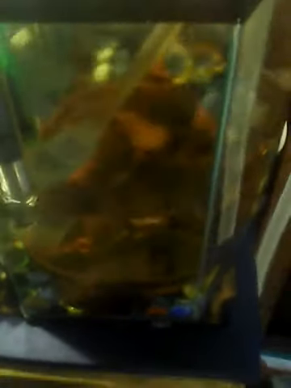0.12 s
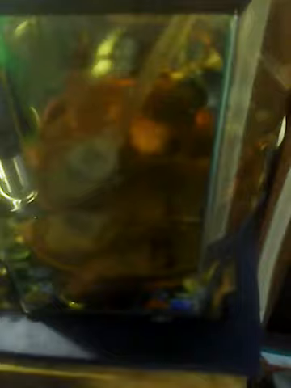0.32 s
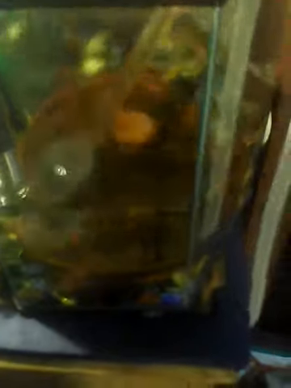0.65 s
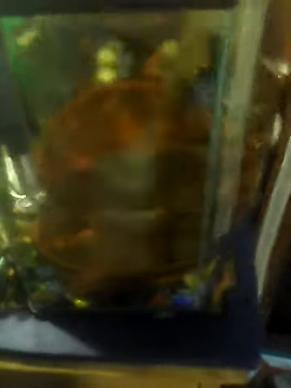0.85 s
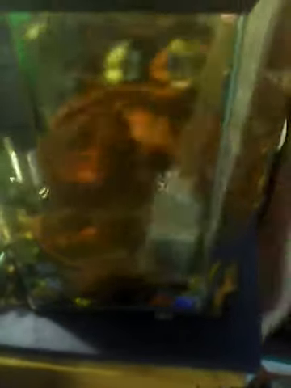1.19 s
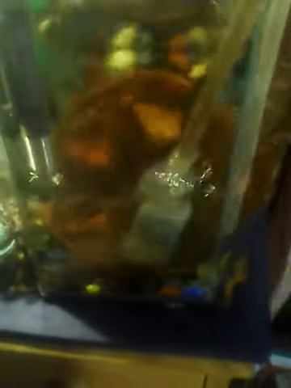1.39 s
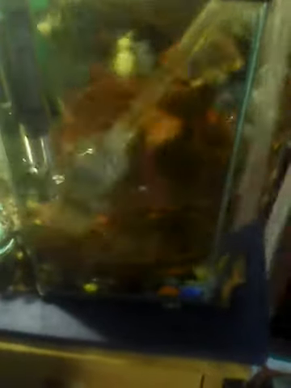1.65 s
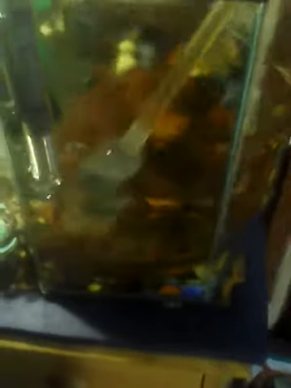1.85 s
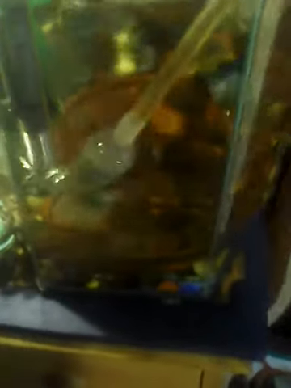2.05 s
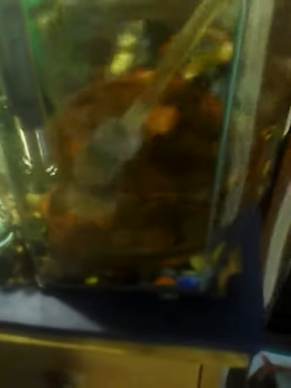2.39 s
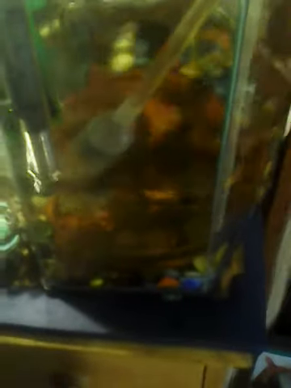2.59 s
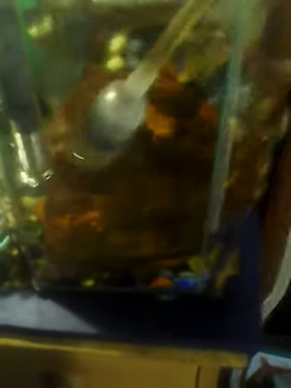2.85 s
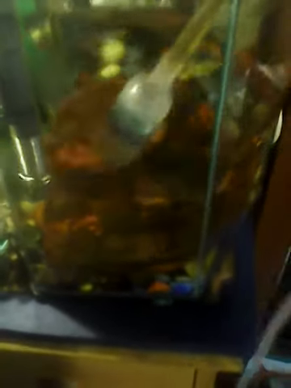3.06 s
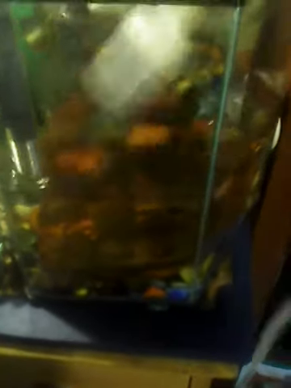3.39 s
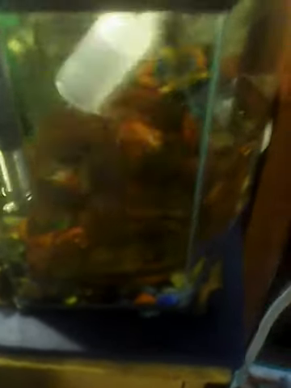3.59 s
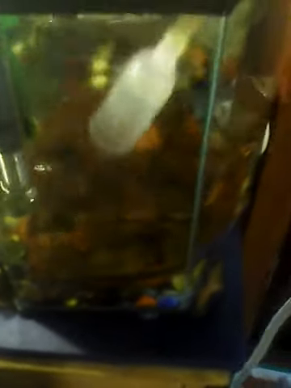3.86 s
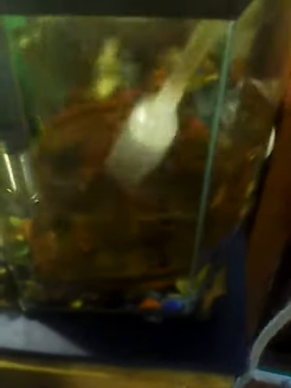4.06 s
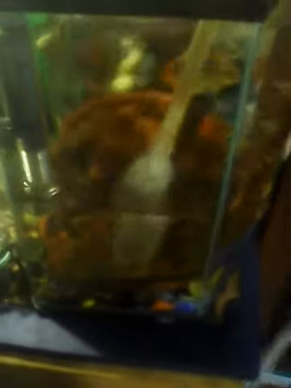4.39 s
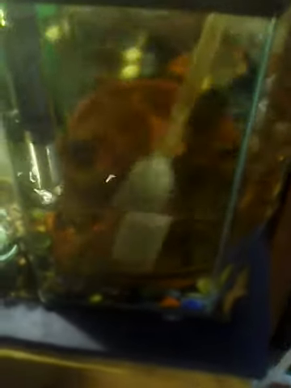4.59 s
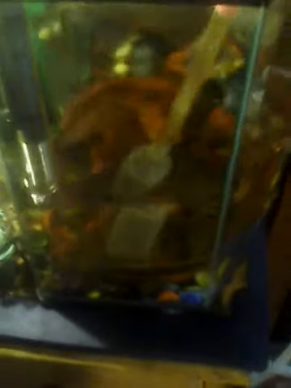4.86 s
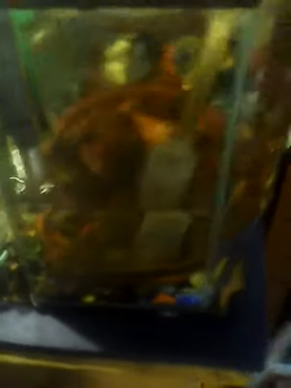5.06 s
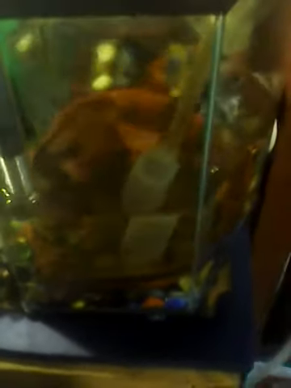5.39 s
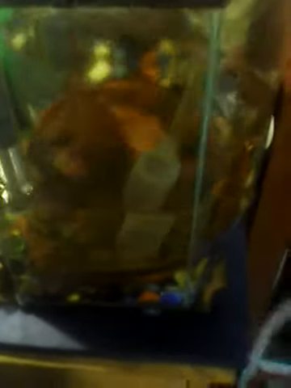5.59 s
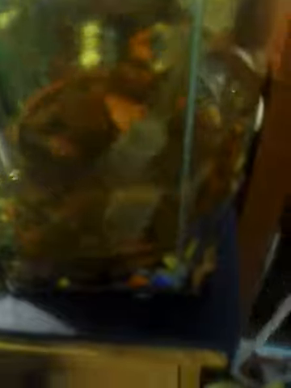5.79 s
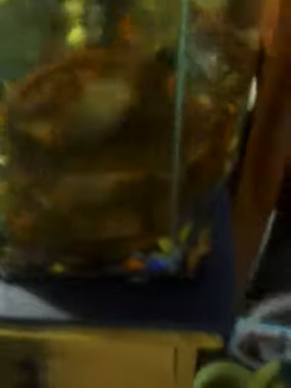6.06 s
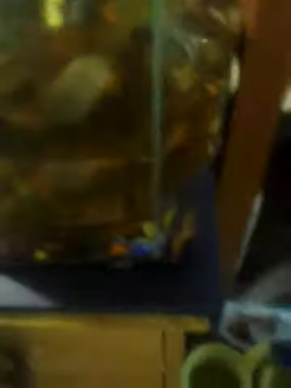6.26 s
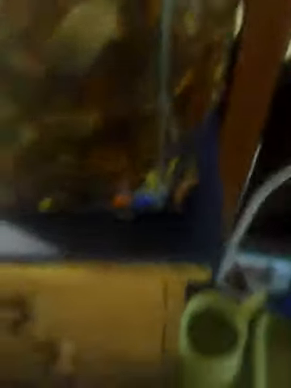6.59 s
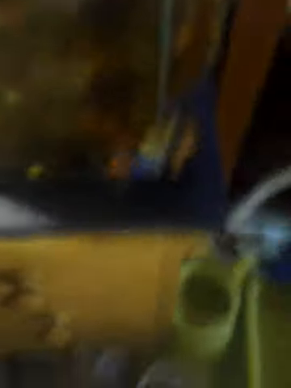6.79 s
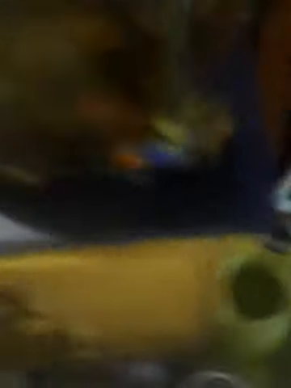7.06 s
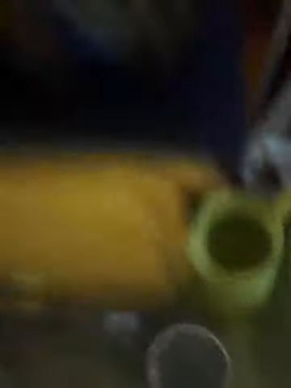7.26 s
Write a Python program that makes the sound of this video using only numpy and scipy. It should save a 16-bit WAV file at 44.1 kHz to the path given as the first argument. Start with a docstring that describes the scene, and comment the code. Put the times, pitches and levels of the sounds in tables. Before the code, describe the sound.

A plastic siphon tube knocks and clatters against a half-empty glass tank, with hollow booms, water drips, a brief gurgling chatter, then low bumps.

```python
"""Drops and soft nudges open the scene; from 0.5 s a plastic siphon tube knocks on a half-empty glass tank.
The struck modes ring with a noisy clatter, and the hollow tank booms in fading sines over a murmur.
Drops (splash noise and rising bubble tones) thicken from 2 s. At 3.3-3.9 s the lifted tube chatters:
uneven bursts ring its air column, and air glugs. From 6.3 s the hose slides as a moving band of noise,
then the stand is bumped with low sagging tones. All is heard by a phone in a small, faintly noisy room."""
import sys
import numpy as np
from scipy import signal
from scipy.fft import rfft, irfft
from scipy.io import wavfile
from scipy.ndimage import uniform_filter1d

SR = 44100
rng = np.random.default_rng(int(sys.argv[2]) if len(sys.argv) > 2 else 0)


def generate_wav(sig):
    """Save sig (samples, or channels by samples) to the path in sys.argv[1] as 16-bit PCM at SR."""
    pcm = np.round(np.clip(np.atleast_2d(sig).T, -1, 1) * 32767).astype(np.int16)
    wavfile.write(sys.argv[1], SR, pcm)


N = 328104

# what tube and panes ring with: (frequency [Hz], level [dB], time to fade 60 dB [s])
PANE_MODES = [(456, -0.5, 0.15), (639, 10, 0.04), (731.7, -0.5, 0.14), (872, 5, 0.022), (992, 2, 0.097),
              (1102, -8.5, 0.23), (1350, 6.5, 0.0083), (1735, -13, .06), (1887, -2, 0.032),
              (2009, 4, 0.028), (2190, -14, 0.043), (2590, -8, .04), (3440, -11, 0.058), (3440, 2, .03),
              (5130, -1.5, 0.014), (6170, 2, 0.01)]
# the hollow tank booms at each push: (time [s], level [dB], frequency [Hz], time to fade 60 dB [s])
TANK_BOOMS = [(0.497, -27, 328, 0.029), (0.909, -36.5, 267, 0.06), (0.948, -17, 270.4, 0.085),
              (0.965, -22, 259.5, 0.043), (1.113, -17, 319, 0.069), (1.19, -30.5, 330, 0.18),
              (1.2127, -20, 274.3, 0.05), (1.222, -10, 254, 0.026), (1.313, -16.5, 233, 0.077),
              (1.692, -11, 263, 0.041), (1.844, -32, 369, 0.05), (2.287, -25.5, 308, 0.037),
              (2.316, -30.5, 294, 0.05), (3.021, -28.5, 314, 0.012), (3.253, -29, 307, 0.014),
              (3.381, -27, 344, 0.011), (3.43, -37, 345, 0.033), (3.481, -31, 205, 0.079),
              (3.549, -26, 241, 0.023), (3.659, -34.5, 290, 0.021), (3.7, -33, 300, 0.033),
              (3.784, -29, 221, 0.043), (3.819, -33, 315, 0.027), (3.931, -25.5, 271, 0.034),
              (3.986, -37.5, 308, 0.061), (4.608, -32.5, 250, 0.087), (5.068, -25, 229.4, 0.071),
              (5.098, -42.5, 244, 0.082), (5.616, -30.5, 250.5, 0.096), (6.118, -37, 303, 0.06)]


def undb(db):
    """Turn decibels into gain."""
    return 10 ** (np.asarray(db) / 20)


def level(x, db):
    """Scale a sound to an rms level in dB."""
    return x * undb(db) / np.sqrt(np.mean(x ** 2))


def curve(table):
    """Draw a table sample by sample: the gain, silent outside its span, then the other columns."""
    times, db, *others = np.transpose(table)
    t = np.arange(N) / SR
    gain = undb(np.interp(t, times, db, -200, -200))
    return [gain] + [np.interp(t, times, column) for column in others]


def fade_60db(t, t60):
    """Fade evenly in decibels, losing 60 dB in t60 seconds."""
    return np.exp(-np.log(1000) * t / t60)


def ring(x, hz, t60):
    """Let x strike one mode, which rings at its own pitch and dies away."""
    pole = np.exp((2j * np.pi * hz - np.log(1000) / max(t60, .003)) / SR)
    return signal.lfilter([1], [1, -pole], x + 0j).imag


def body(x, peaks):
    """Colour x with resonances (frequency [Hz], width [Hz], level [dB]); a wide one fades fast."""
    return sum(undb(db) * width * ring(x, hz, np.log(1000) / (np.pi * width)) for hz, width, db in peaks)


def add(out, time_s, sound):
    """Mix a short sound in at a given time."""
    start = int(time_s * SR)
    out[start:start + len(sound)] += sound[:N - start]


def tone(hz, t60, swell=0.00053, glide=0.):
    """Make a sine that swells (seconds), then fades; positive glide raises its pitch, negative lowers it."""
    t = np.arange(int(SR * (t60 + swell))) / SR
    rise = np.sin(np.pi / 2 * np.minimum(t / max(swell, 1e-4), 1)) ** 2
    fade = fade_60db(np.maximum(t - swell, 0), t60)
    return rise * fade * np.sin(2 * np.pi * hz * (t + glide * t ** 2 / t60))


def clicks(rate, spread_db):
    """Scatter random clicks, rate per second on average, some stronger than the rest."""
    size_db = spread_db * np.minimum(rng.exponential(size=N), 3)
    return (rng.random(N) < rate / SR) * rng.choice([-1, 1], N) * undb(size_db)


def band(x, lo_hz, hi_hz):
    """Keep only the sound between two frequencies."""
    return signal.sosfilt(signal.butter(2, [lo_hz, hi_hz], "band", fs=SR, output="sos"), x)


def unit(x):
    """Scale a sound to a peak of 1."""
    return x / np.abs(x).max()


def knocks():
    """A short rough contact rings modes, most those near the spot struck; gravel and water clatter after."""
    # tube against glass: (time [s], middle-band peak [dB], body [dB], brightness [dB], favoured pitch [Hz]);
    # body and brightness are relative to the middle band
    blows = [(0.5004, -27.5, -10.5, -10.5, 2180), (0.9462, -22.5, 0.5, -12.5, 1330),
             (1.0958, -33, 0.5, -2, 1810), (1.1872, -37, 3.5, -14, 870), (1.2211, -37.5, 7, -14, 750),
             (1.2386, -30, -5, -14.5, 2030), (1.2595, -32.5, -0.5, -11, 2000), (1.292, -44, -5, 0, 2000),
             (1.2998, -15.5, -3.5, 6.5, 2600), (1.3644, -34, 0.5, 14.5, 3120), (1.6277, -48, -2, 1, 2470),
             (1.6872, -15, -1.5, -9, 900), (1.823, -49, -8, -4, 1210), (1.8457, -33, -2.5, 1.5, 2040),
             (1.8964, -49, 1.5, 2, 750), (2.0292, -47, 6, -19, 910), (2.2887, -49.5, 9.5, -9, 760),
             (2.3183, -39.5, 3, -33, 910), (3.022, -45, 13.5, -4, 900), (3.2559, -69, 33, -18, 830),
             (3.3829, -56.5, 24.5, -14, 730), (3.9295, -42.5, 10.5, -26, 830),
             (3.9894, -58.5, 13.5, -4, 757), (4.6144, -44, -4.5, -8.5, 740), (4.6704, -48.5, -16, -3, 1950),
             (4.718, -44.5, -18, -8.5, 2030), (4.8708, -52.5, 6, -21, 1050),
             (5.0345, -43.5, -14, -4.5, 1840), (5.0599, -30.5, -10, -8.5, 1800),
             (5.6115, -30, 8, -10.5, 735), (6.1182, -52, -8, -11.5, 1395), (6.1805, -25, 2.5, -12.5, 1610),
             (6.7474, -49, 1.5, 3, 900), (7.2258, -64, -6, 14, 2140), (7.3754, -47.5, -6, -7, 1310)]
    contact_s, crack_s, rise_s = 0.0015, 0.0045, 0.0011
    favour_db, scatter_db, detune_per_db = 6, 1.5, 0.0092
    ring_db, grit_db = 1.5, 1.5
    tail_db, tail_t60_s, longer_per_db = -10, 0.12, 0.017
    high_db, top_db, thin_t60_s = -3.5, -6, .25
    out, t = np.zeros(N), np.arange(SR // 3) / SR
    for time_s, db, low_db, bright_db, near_hz in np.array(blows):
        push = rng.standard_normal(len(t)) * np.exp(-t / contact_s)
        # no two blows excite the modes quite alike
        scatter = scatter_db * rng.standard_normal(len(PANE_MODES))
        rings = np.zeros(len(t))
        for change_db, (hz, mode_db, t60) in zip(scatter, PANE_MODES):
            near = favour_db * np.exp(-(np.log(hz / near_hz) / 0.13) ** 2)
            mode = unit(ring(push, hz * (1 + detune_per_db * change_db), t60))
            rings += undb(mode_db + change_db + near) * mode
        # a loud, bright blow leaves a longer clatter
        stretch = (1 + longer_per_db * (db + bright_db + 45.5)).clip(.5)
        fade = np.exp(-t / crack_s) + undb(tail_db) * fade_60db(t, tail_t60_s * stretch)
        # smoothed noise makes the clatter's loudness uneven
        wander = uniform_filter1d(rng.standard_normal(len(t)), size=130) * np.sqrt(130)
        clatter = band(rng.standard_normal(len(t)), 270, 14000) * undb(grit_db * wander)
        clatter = clatter * fade * (1 - np.exp(-t / rise_s))
        blow = undb(ring_db) * unit(rings) + unit(clatter)
        # a harder contact gives more treble, a flatter one more body
        for lo, hi, share_db in [(500, 1200, low_db), (1200, 2350, 0), (2350, 3600, bright_db),
                                 (3600, 7200, bright_db + high_db), (7200, 13000, bright_db + top_db)]:
            part = band(band(blow, lo, hi), lo, hi)
            if lo > 7000:  # the top dies sooner
                part = part * fade_60db(t, thin_t60_s)
            add(out, time_s, undb(db + share_db) * unit(part))
    return out


def tank():
    """Pushes boom; drag, nudges and slosh drive an uneven murmur in the same hollow and a faint rub."""
    # dragging tube and hose: (time [s], murmur level [dB], rub level [dB])
    drag_curve = [(0.0, -77, -72), (0.35, -65.5, -57), (0.86, -72.5, -70), (1.1, -52, -57),
                  (1.4, -45, -49.5), (1.47, -63.5, -64), (1.84, -53, -55.5), (2.11, -66.5, -61.5),
                  (2.6, -70, -62), (3.32, -74, -68), (3.55, -47.5, -50.5), (3.8, -55.5, -76),
                  (4.04, -71.5, -60.5), (4.5, -73.5, -69.5), (4.89, -67, -68), (6.6, -80.5, -63.5),
                  (6.85, -62, -58.5), (7.44, -77.5, -68.5)]
    # resonances of the hollow: (frequency [Hz], width [Hz], level [dB])
    hollow = [(228, 40, -31.5), (275, 110, 2.5), (287, 230, 13), (377, 180, 2.5)]
    # soft nudges swell in the hollow: (time of peak [s], level [dB], length [s])
    nudges = [(0.144, -52, .06), (0.198, -60, 0.024), (0.929, -39, 0.044), (0.994, -58, .06),
              (1.503, -49.5, 0.092), (1.63, -46, 0.13), (1.825, -42.5, .05), (1.965, -43.5, 0.027),
              (2.044, -51, 0.13), (2.187, -52, 0.021), (2.448, -56, 0.036), (4.649, -48.5, 0.15),
              (4.746, -44.5, 0.079), (4.945, -54.5, 0.18), (5.061, -40, 0.046), (5.183, -63, 0.018),
              (5.374, -50, 0.13), (5.57, -54, 0.061), (5.726, -60.5, .03), (5.795, -54, 0.048),
              (5.846, -50.5, 0.048), (5.919, -61.5, 0.025), (6.02, -56.5, 0.053), (6.187, -43, 0.09),
              (6.4, -51, 0.1), (6.486, -53, 0.068), (6.757, -43, 0.096), (6.865, -55, 0.025),
              (7.065, -51, 0.15), (7.233, -47, 0.036), (7.387, -54, 0.15)]
    nudge_rise, nudge_rub_db = 0.34, -9  # share of the length spent rising; rub relative to murmur
    boom_swell_s = 0.0033
    slosh_db, slosh_t60_s = -18.5, 0.16  # murmur that follows every boom
    drag, rub_db = curve(drag_curve)
    murmur = level(band(body(clicks(600, 0.87), hollow), 200, 350), 0)
    grain = clicks(1800, 3.1)
    panes = sum(undb(db) * ring(grain, hz, t60) for hz, db, t60 in PANE_MODES)
    rub = level(band(panes, 300, 2500), -13.5) + level(band(grain, 310, 2300), -7.0)
    booms, push, t = np.zeros(N), np.zeros(N), np.arange(N) / SR
    for time_s, db, hz, t60 in TANK_BOOMS:
        add(booms, time_s, undb(db) * tone(hz, t60, boom_swell_s))
        add(push, time_s, undb(db + slosh_db) * fade_60db(t[:SR // 2], slosh_t60_s))
    for peak_s, db, length_s in nudges:
        # 20 dB up over the rise, 20 dB down over the rest
        rising = (t - peak_s) / (nudge_rise * length_s)
        falling = (peak_s - t) / ((1 - nudge_rise) * length_s)
        push += undb(db + 20 * np.minimum(rising, falling))
    booms = band(band(booms, 180, 860), 170, 670)
    return booms + (drag + push) * murmur + (undb(rub_db) + undb(nudge_rub_db) * push) * rub


def tube_chatter():
    """The lifted tube chatters on the rim: uneven bursts ring its air column and small bubbles pop."""
    # chatter loudness: (time [s], level [dB])
    chatter = [(3.3, -68), (3.39, -51), (3.472, -57.5), (3.516, -37), (3.548, -53.5), (3.586, -39),
               (3.68, -60.5), (3.728, -43.5), (3.79, -38.5), (3.92, -69)]
    # resonances of the air column: (frequency [Hz], width [Hz], level [dB])
    pipe = [(757, 22, 21.5), (940, 150, 10), (1123, 19, 20.5), (1250, 32, 2), (1446, 30, 13.5),
            (1780, 61, 2), (2060, 40, -18), (2140, 19, -13)]
    # air bursts out of the mouth about 45 times a second, never evenly
    gap, size = rng.standard_normal((400, 2)).T
    bursts = np.zeros(N)
    bursts[np.cumsum(SR / 45 * np.exp(.3 * gap)).astype(int) % N] = undb(4.0 * size)
    column = level(body(bursts + undb(-11.0) * clicks(400, 3.4), pipe), -0.62)
    # bubbles of every size, the high ones shortest
    pops = np.zeros(N)
    start_s, end_s = chatter[0][0], chatter[-1][0]
    for when, pitch, size in rng.random((90, 3)):
        hz = 900 * 2 ** (2.4 * pitch)
        pop = undb(-3.0 * np.log(1.01 - size)) * tone(hz, 45 / hz, glide=0.091)
        add(pops, start_s + when * (end_s - start_s), pop)
    return curve(chatter)[0] * (column + undb(-11) * pops)


def glugs():
    """Air glugs in the tube mouth: each is a swelling sine that rises slightly as it fades."""
    # (time [s], level [dB], starting pitch [Hz])
    mouth_glugs = [(2.834, -53.5, 1163), (3.258, -33.5, 765), (3.385, -35.5, 744), (3.486, -40, 747),
                   (3.514, -34.5, 1133), (3.576, -34, 739), (3.734, -44, 1138), (3.784, -37.5, 1155),
                   (3.809, -44, 744), (3.932, -44, 729), (5.994, -51.5, 539), (6.049, -51.5, 492)]
    swell_s, t60_s = 0.0066, 0.12
    out = np.zeros(N)
    for time_s, db, hz in mouth_glugs:
        add(out, time_s, undb(db) * tone(hz, t60_s, swell_s, glide=0.05))
    return out


def hose_slide():
    """The hose slides over the rim: friction noise moved to one gliding pitch, plus a broad hiss."""
    # (time [s], level [dB], resonance [Hz])
    slide = [(6.34, -84, 1030), (6.376, -64.5, 783), (6.42, -54.5, 1680), (6.444, -49.5, 1770),
             (6.508, -48.5, 1895), (6.556, -68, 1713), (6.58, -84.5, 1370), (6.74, -71.5, 998),
             (6.83, -59.5, 1512), (6.93, -70, 1510), (7.0, -83, 1504)]
    gain, hz = curve(slide)
    grain = clicks(5100, 1.0)
    # multiplying low noise by a gliding sine carries it up to the glide
    sweep = np.cos(2 * np.pi * np.cumsum(hz) / SR) * band(grain, 14, 560)
    return gain * (level(sweep, 0.5) + level(band(grain, 440, 8500), -4.5))


def water():
    """A drop is a small splash and a rising, fluttering bubble; fine dripping is many tiny ones over a fizz."""
    # drops: (time [s], bubble level [dB], starting pitch of bubble [Hz], time to fade 60 dB [s])
    drops = [(0.0598, -52, 5380, 0.046), (0.1876, -46, 1424, 0.12), (0.2054, -48, 1600, 0.025),
             (2.0028, -46, 2250, 0.038), (2.045, -49, 2550, 0.025), (2.185, -53, 3200, 0.053),
             (2.3622, -38, 2840, 0.012), (2.372, -43.5, 1520, 0.022), (2.388, -54, 1470, 0.059),
             (2.516, -52.5, 1560, 0.068), (2.556, -58, 4880, 0.023), (2.666, -57, 5320, 0.04),
             (2.761, -48, 4840, 0.037), (2.84, -55.5, 4370, 0.026), (2.941, -57, 3550, 0.05),
             (2.592, -49, 2330, 0.039), (2.696, -60, 2050, 0.053), (2.722, -49, 1650, 0.11),
             (2.7611, -48.5, 1510, 0.042), (2.9, -46.5, 5820, 0.029), (3.11, -48, 1687, 0.12),
             (3.135, -43.5, 2020, 0.028), (3.321, -41, 2220, 0.038), (3.3506, -56, 3770, 0.055),
             (3.3683, -50, 2310, 0.12), (3.432, -50, 1490, 0.069), (3.4552, -42, 3330, 0.065),
             (3.5445, -29, 2675, 0.022), (3.5728, -40, 2066, 0.19), (3.725, -44.5, 2170, 0.059),
             (3.7862, -38.5, 1460, 0.06), (3.8748, -45.5, 2265, 0.051), (4.0586, -57, 1880, 0.044),
             (4.0908, -40.5, 2070, 0.04), (4.1121, -47, 4220, 0.025), (4.148, -49.5, 2070, 0.072),
             (4.298, -50.5, 1816, 0.037), (4.4104, -43.5, 2680, 0.039)]
    # fine dripping: (time [s], level [dB])
    trickle = [(0.0, -64), (1.3, -65), (1.66, -65.5), (1.78, -67), (2.09, -66.5), (3.38, -63.5), (3.5, -53),
               (3.65, -60), (3.79, -62), (3.96, -62.5), (4.37, -66.5), (5.18, -81), (6.18, -85),
               (6.36, -62.5), (6.8, -72), (7.44, -66)]
    # the open tank colours the dripping: (frequency [Hz], width [Hz], level [dB])
    fizz_peaks = [(2090, 210, -3), (3850, 200, -3.5), (5346, 110, -3), (6360, 310, -2.5)]
    out, fine, t = np.zeros(N), np.zeros(N), np.arange(SR // 8) / SR
    for time_s, db, hz, t60 in drops:
        splash = band(rng.standard_normal(len(t)), hz / 1.21, hz * 1.47) * np.exp(-t / 0.0066)
        bubble = tone(hz, t60, glide=0.045)
        # loudness flutters 70 times a second
        flutter = 1 + 0.42 * np.sin(2 * np.pi * (70 * np.arange(len(bubble)) / SR + rng.random()))
        add(out, time_s, undb(db) * bubble * flutter)
        add(out, time_s, undb(db - 4.5) * splash / splash.max())
    for when, pitch, size in rng.random((2500, 3)):
        hz = 1500 * 2 ** (2.3 * pitch)
        droplet = undb(-4.0 * np.log(1.01 - size)) * tone(hz, 40 / hz, glide=0.15)
        add(fine, when * N / SR, droplet)
    grain = clicks(3000, 2.7)
    fizz = level(band(grain, 2500, 12000), -2.0)
    fizz += level(band(body(grain, fizz_peaks), 1800, 7000), -5)
    return out + curve(trickle)[0] * (level(fine, -11) + fizz)


def spray():
    """Spray ticks on the panes: tiny bright bursts of noise, each with a short hiss."""
    # (time [s], peak above 7.5 kHz [dB], part under 7 kHz relative to it, before a 0.5 dB cut [dB])
    ticks = [(0.0595, -61, 18), (0.185, -61.5, 12.5), (0.4165, -68, 19.5), (0.678, -61, 9.5),
             (0.723, -65.5, 16.5), (1.525, -71.5, 20.5), (1.6477, -71, 17), (2.4004, -69.5, 19),
             (2.7617, -66, 16), (2.8988, -68, 15), (2.9377, -68, 8), (3.259, -62, 6), (3.396, -58, 13),
             (3.454, -48, -28), (3.5044, -62, 9), (3.564, -48.5, 7), (4.047, -66, 20.5), (4.2462, -61, 8.5),
             (4.6695, -63, 13.5)]
    tick_s, smear_s, smear_db = 0.0031, 0.049, -14
    out, t = np.zeros(N), np.arange(SR // 10) / SR
    for time_s, db, under_db in ticks:
        fade = np.exp(-t / tick_s) + undb(smear_db) * np.exp(-t / smear_s)
        tick = rng.standard_normal(len(t)) * fade
        high, under = band(tick, 7500, 13000), band(tick, 4500, 7000)
        mix = high / high.max() + undb(under_db - 0.5) * under / under.max()
        add(out, time_s, undb(db) * mix)
    return out


def stand():
    """Bumps are dull low tones that sag in pitch; a deep noise rumble follows each boom of the tank."""
    # (time [s], level [dB], starting pitch [Hz], time to fade 60 dB [s])
    bumps = [(6.751, -28.5, 168, 0.079), (6.768, -33, 87.3, 0.24), (6.8, -44, 98, 0.19),
             (6.871, -50.5, 108, 0.13), (7.223, -36.5, 169.5, 0.096), (7.249, -43.5, 133, 0.16),
             (7.289, -47, 50.9, 0.27)]
    shake_db, shake_t60_s = -35, 0.41
    out, shake, t = np.zeros(N), np.zeros(N), np.arange(SR // 2) / SR
    for time_s, db, hz, t60 in bumps:
        add(out, time_s, undb(db) * tone(hz, t60, 0.0022, glide=-0.18))
    for time_s, db, _, _ in TANK_BOOMS:
        rise = 1 - np.exp(-t / 0.013)
        add(shake, time_s, undb(db + shake_db) * fade_60db(t, shake_t60_s) * rise)
    rumble = level(band(band(rng.standard_normal(N), 50, 150), 50, 110), 0)
    return out + shake * rumble


def air():
    """Steady room and microphone noise: random noise shaped along its spectrum."""
    # noise spectrum: (frequency [Hz], relative level [dB])
    spectrum = [(15, -53), (25, -15), (86, 7.5), (313, -1.5), (495, -5), (567, -10), (804, -6.5),
                (1710, -16.5), (2010, -8.5), (2490, -16.5), (6210, -18), (7300, -22.5), (8580, -39),
                (12800, -37.5), (15500, -37.5)]
    hz = np.maximum(np.arange(N // 2 + 1) * SR / N, 1)
    points_hz, points_db = np.transpose(spectrum)
    shape = undb(np.interp(np.log(hz), np.log(points_hz), points_db))
    return level(irfft(rfft(rng.standard_normal(N)) * shape, N), -63)


def room(x):
    """Dense, fading echoes of tank walls and a small room, starting 4 ms late."""
    t60_s, echo_db = 0.16, -8
    t = np.arange(SR // 2) / SR
    tail = rng.standard_normal(len(t)) * fade_60db(t, t60_s) * (t > .004)
    tail *= undb(echo_db) / np.sqrt(np.sum(tail ** 2))
    return x + signal.fftconvolve(x, tail)[:N]


def microphone(x):
    """A small capsule: thin in the bass, flat to about 7 kHz, then a steep step down."""
    x = signal.sosfilt(signal.butter(3, 70, "high", fs=SR, output="sos"), x)
    main = signal.sosfilt(signal.butter(10, 6800, fs=SR, output="sos"), x)
    return main + undb(-22.0) * x


def scene():
    """Mix all sources; bumps reach the phone through hand and floor, so they skip the capsule filter."""
    tube = tube_chatter() + glugs() + hose_slide()
    airborne = microphone(room(knocks() + tank() + tube + water()))
    # spray and air are made as the capsule already hears them
    return (airborne + room(stand()) + spray() + air())[None]


def record(dry):
    """The phone cuts the top above 15.7 kHz."""
    return signal.sosfilt(signal.ellip(10, .2, 70, 15700, fs=SR, output="sos"), dry)


dry = scene()
out = record(dry)
generate_wav(out)
```